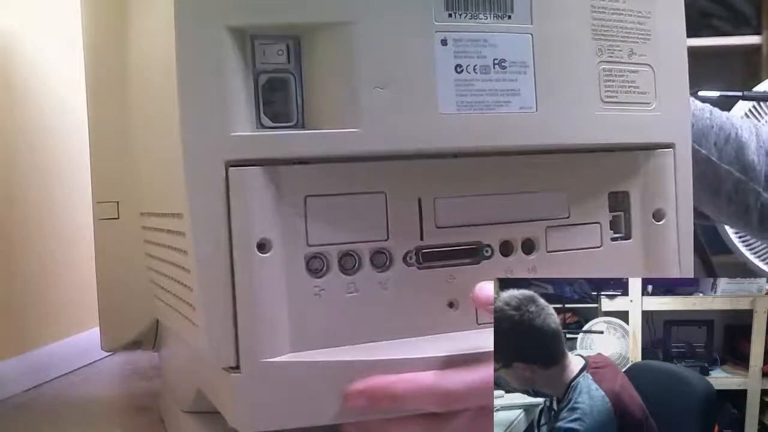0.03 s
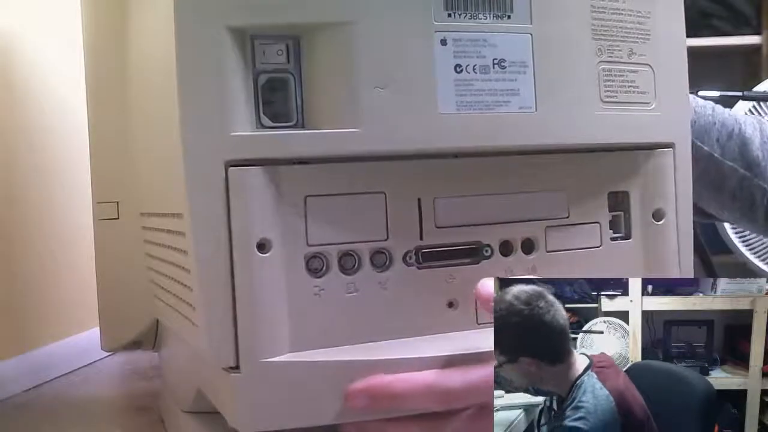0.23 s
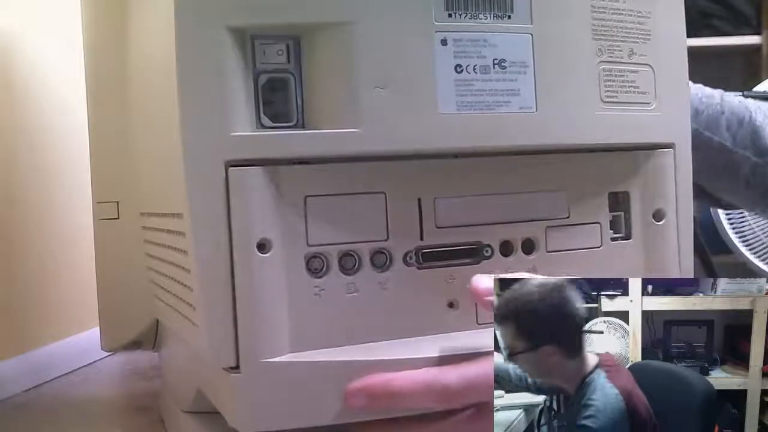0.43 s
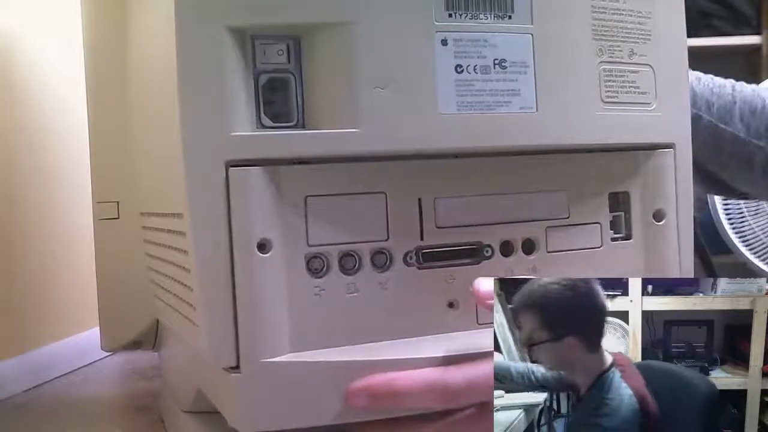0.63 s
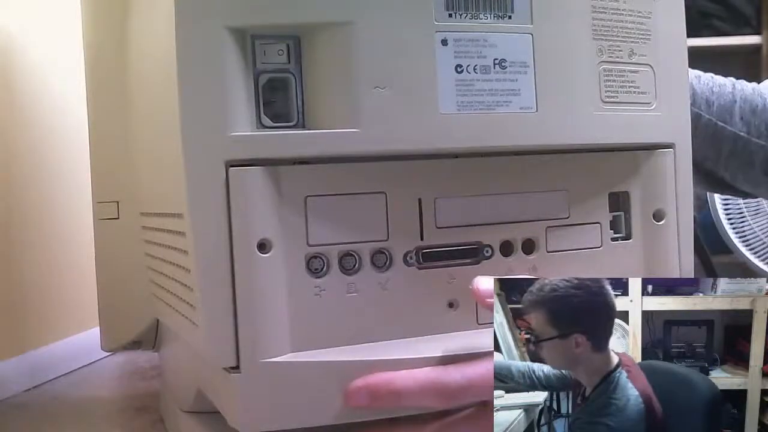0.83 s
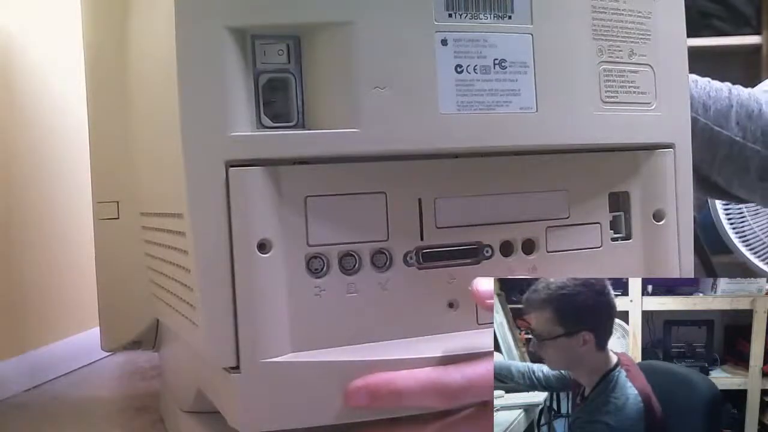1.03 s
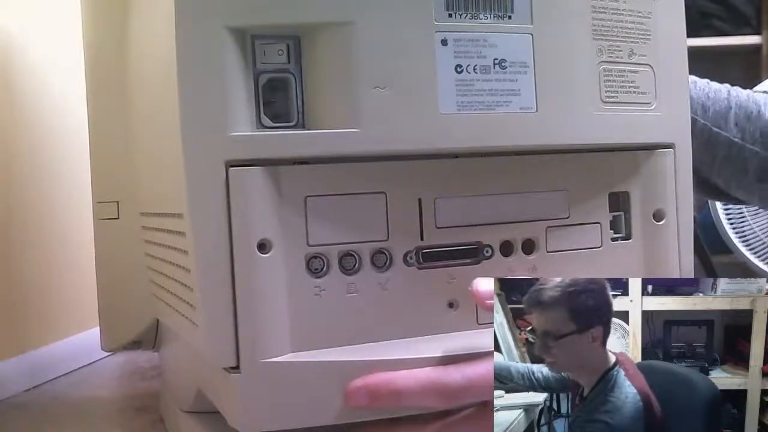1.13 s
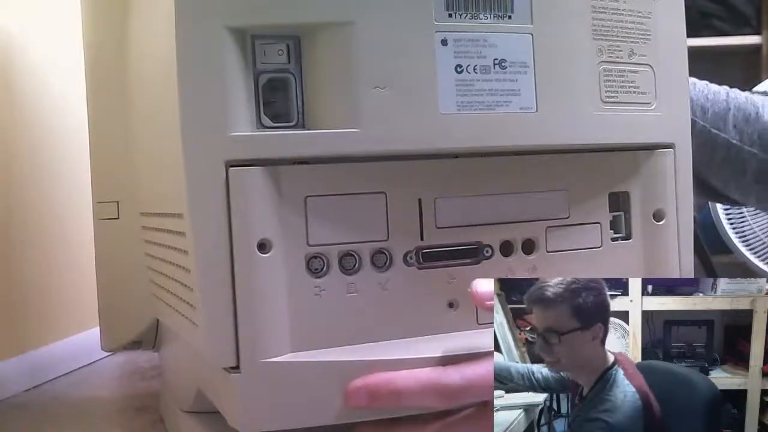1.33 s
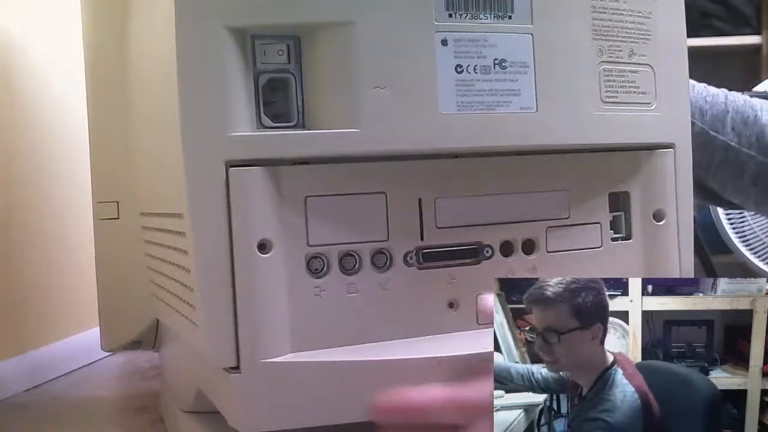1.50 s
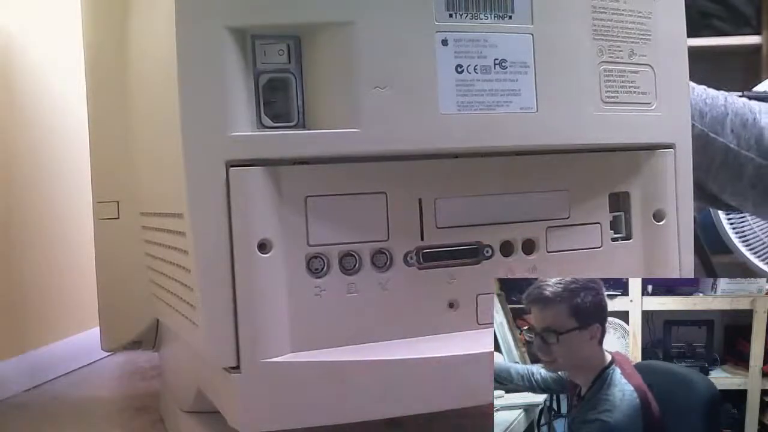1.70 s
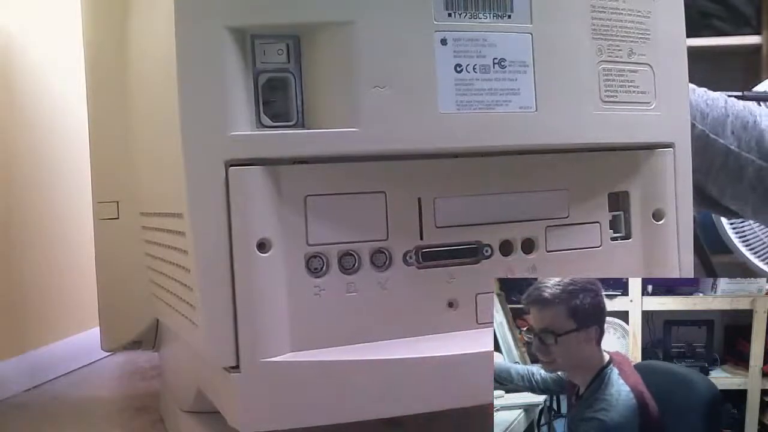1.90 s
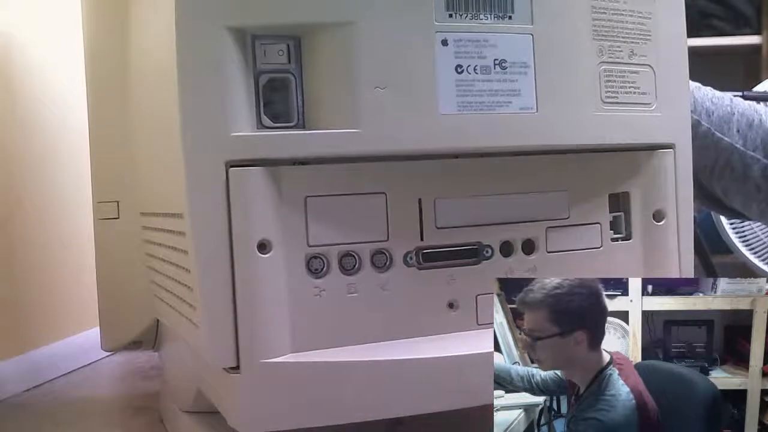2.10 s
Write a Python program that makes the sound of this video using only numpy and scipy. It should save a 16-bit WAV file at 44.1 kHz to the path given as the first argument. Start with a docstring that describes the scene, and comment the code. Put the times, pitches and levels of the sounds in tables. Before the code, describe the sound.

A sharp plastic snap rings briefly through a computer case, followed by quiet bumps and rubbing

```python
"""One loud, brittle crack of plastic is heard as hands work at an old computer on a desk.
Its fracture is a run of noise bursts; decaying sine modes make the shell and the metal inside ring.
Noise whose bands die at different speeds is the room's answer.
Then a hand slides off in grainy hiss, with noise-burst ticks, soft bumps and hollow knocks,
over steady shaped noise and a low mains hum of sines."""
import sys
import numpy as np
from scipy import signal
from scipy.fft import rfft, irfft
from scipy.io import wavfile
from scipy.ndimage import uniform_filter1d

SR = 44100
rng = np.random.default_rng(int(sys.argv[2]) if len(sys.argv) > 2 else 0)


def store_wav(level_fs):
    """Save 16-bit WAV to argv[1]."""
    pcm = np.round(np.clip(np.atleast_2d(level_fs), -1, 1) * 32767)
    wavfile.write(sys.argv[1], SR, pcm.T.astype(np.int16))


N = 94815  # length in samples


def amp(db):
    """Level to amplitude: 20 dB is a factor of ten."""
    return 10 ** (np.asarray(db) / 20)


def evened(x):
    """Normalisation: scales a signal to rms 1."""
    return x / np.sqrt(np.mean(x ** 2) + 1e-20)


def read(points, hz):
    """Logarithmic pitch scale: interpolates a table along log frequency."""
    f, value = np.transpose(points)
    return np.interp(np.log(hz + 1), np.log(f + 1), value)


def add(mix, start_s, sound):
    """Superposition: adds a sound into the mix from its start, cut at the end of the mix."""
    part = mix[max(round(start_s * SR), 0):][:len(sound)]
    part += sound[:len(part)]


def noise(colour, size):
    """Spectral synthesis: a set magnitude with random phases gives noise, here of rms 1."""
    hz = np.fft.rfftfreq(size, 1 / SR)
    phases = np.exp(2j * np.pi * rng.random(len(hz)))
    return evened(irfft(amp(read(colour, hz)) * phases, size))


def fade(t, t60):
    """Exponential damping: 60 dB down after t60 seconds."""
    return np.exp(-np.log(1000) * t / t60)


def burst(colour, rise_s, t60, size):
    """Dense modes merge: many overlapping resonances sound as coloured noise that dies away."""
    t = np.arange(size) / SR
    return noise(colour, size) * np.minimum(t / rise_s, 1) * fade(t, t60)


def ring(modes, rise_s=0.0014):
    """Modal superposition: a struck body sounds as a sum of damped sines."""
    t = np.arange(N) / SR
    out = np.zeros(N)
    for hz, db, t60 in modes:
        out += amp(db) * fade(t, t60) * np.sin(2 * np.pi * (hz * t + rng.random()))
    return out * np.minimum(t / rise_s, 1)


# Snaps as the fracture runs. Each row: start in seconds, relative level in dB.
FRACTURE_SNAPS = [(0.2429, -26), (0.2445, -12), (.2450, 5.5), (0.2456, 1.5), (0.2481, 2.5), (0.25, -2.5),
                  (0.2504, -7.5), (0.2567, -9.5)]
# Colour of a snap. Each row: frequency in Hz, relative level in dB.
SNAP_SPECTRUM = [(40, -45.5), (330, -22), (550, -4.5), (1500, -6), (2300, -14.5), (4000, -11.5),
                 (5400, -11), (6200, 3), (7200, -1), (8500, -9), (11000, -8.5), (13000, -3.5),
                 (16000, -10.5)]
SNAP_T60_S, SNAP_DB, SNAP_RISE_S = 0.014, -6, .0002


def fracture():
    """Brittle fracture: strain is released in a quick run of abrupt, broadband snaps."""
    out = np.zeros(N)
    for start_s, db in FRACTURE_SNAPS:
        snap = burst(SNAP_SPECTRUM, SNAP_RISE_S, SNAP_T60_S, size=1024)
        add(out, start_s, amp(SNAP_DB + db) * snap)
    return out


# Modes of the plastic shell. Each row: frequency in Hz, relative level in dB, t60 in seconds.
SHELL_MODES = [(420.3, -20, 0.2), (474.4, -21.5, .17), (561, -17, .16), (605, -20, .12), (684, -18.5, .14),
               (744, -26.5, .14), (836, -21, 0.11), (882, -20, .1), (920, -17, .12), (1090, -20, .14),
               (1162, -24, .14), (1217.6, -18, .12), (1427, -20, .12), (1478, -20, .13), (1590, -25.5, .13),
               (1735, -23.5, .13), (2488, -21, 0.13), (2990, -23, 0.15), (3177, -22, 0.12), (6040, -17, .1)]
# Lighter knock as the shell settles back. The row: start in seconds, gain in dB.
SHELL_REBOUND = (.2945, -23.5)
CRACK_S, SHELL_DB = .2450, -2


def shell_response():
    """Impulse response: the crack excites the shell's modes, and its rebound excites them again."""
    out = np.zeros(N)
    add(out, CRACK_S, amp(SHELL_DB) * ring(SHELL_MODES, rise_s=.003))
    rebound_s, rebound_db = SHELL_REBOUND
    add(out, rebound_s, amp(rebound_db) * ring(SHELL_MODES))
    return out


# The wavering of thin metal: its fastest rate in Hz, and its rms share of the amplitude.
WAVER_HZ, WAVER = 9.7, 0.65


def metal(modes):
    """Slow modulation: lightly damped metal modes waver in strength and phase as they decay."""
    t, out = np.arange(N) / SR, np.zeros(N)
    knots = t[::512]
    for hz, db, t60 in modes:
        # four slow random rotations make one complex drift
        drift = np.zeros(len(knots), complex)
        for rate in rng.uniform(-1, 1, size=4):
            drift += np.exp(2j * np.pi * (WAVER_HZ * rate * knots + rng.random())) / 2
        carrier = np.exp(2j * np.pi * (hz * t + rng.random()))
        wavering = 1 + WAVER * np.interp(t, knots, drift)
        out += amp(db) * fade(t, t60) * (carrier * wavering).real
    return out * np.minimum(t / 0.0055, 1)


# Modes of the metal chassis. Each row: frequency in Hz, level in dB, t60 in seconds.
CHASSIS_MODES = [(409, -61.5, 1.3), (457, -64.5, 4), (546.4, -70, 5), (966, -75, 5.2), (1028, -72.5, 3.2),
                 (1140, -63.5, 1.8), (1281, -70.5, 1), (1550, -71.5, 1.3), (1700, -81, 4),
                 (1750, -74.5, 1.6), (1771, -60, .65), (1814, -73.5, 1), (1980, -66, 0.76)]
# A small metal part, sounding from the start. Each row: frequency in Hz, level in dB, t60 in seconds.
SMALL_PART_MODES = [(1125, -73.5, 2.5), (1556, -62, .34), (1739, -67, 0.5), (1771, -65.5, 0.6),
                    (2019, -68.5, 0.77)]
# A tap that sets the chassis ringing again. The row: start in seconds, gain in dB.
TAP = (0.48, -11.5)


def metal_inside():
    """Free vibration: a small part rings faintly from the start, the chassis after crack and tap."""
    out = metal(SMALL_PART_MODES)
    add(out, CRACK_S, metal(CHASSIS_MODES))
    tap_s, tap_db = TAP
    add(out, tap_s, amp(tap_db) * metal(CHASSIS_MODES))
    return out


# Colour of the shell and room answering. Each row: frequency in Hz, relative level in dB.
TAIL_SPECTRUM = [(40, -34), (100, -17.5), (200, -20.5), (330, -16.5), (560, -7.5), (920, -5.5),
                 (1320, -12.5), (1500, -6), (2200, -11.5), (3000, -6), (3800, -13), (5400, -9.5),
                 (6200, -5), (8500, -12.5), (13300, -11.5), (16000, -19.5)]
# Decay of the room. Each row: band centre in Hz, t60 in seconds.
ROOM_DECAY = [(80, 0.27), (350, .19), (700, .14), (2000, .14), (6000, .13), (15000, .125)]
TAIL_RISE_S = .002


def room_tail(size):
    """Frequency-dependent absorption: diffuse reflections die at each band's own speed."""
    t, hz = np.arange(size) / SR, np.fft.rfftfreq(size, 1 / SR)
    spectrum, out = rfft(noise(TAIL_SPECTRUM, size)), np.zeros(size)
    centres, times = np.transpose(ROOM_DECAY)
    # each row of the identity matrix selects one overlapping band
    for band, t60 in zip(np.eye(len(times)), times):
        weight = read(np.c_[centres, band], hz)
        out += irfft(spectrum * weight, size) * fade(t, t60)
    return out * np.minimum(t / TAIL_RISE_S, 1)


# Colour of the faint late reverberation. Each row: frequency in Hz, relative level in dB.
LATE_SPECTRUM = [(60, -32), (220, -22), (400, -4), (700, 2.5), (1300, -1), (3000, -10), (6500, -12),
                 (16000, -22)]
TAIL_DB, LATE_DB, LATE_T60_S = -9.5, -45, 0.38


def room_answer():
    """Reverberation: dense reflections of the crack, with a fainter and slower late field."""
    out = np.zeros(N)
    add(out, CRACK_S, amp(TAIL_DB) * room_tail(size=22050))
    late = burst(LATE_SPECTRUM, .02, LATE_T60_S, size=32768)
    add(out, CRACK_S, amp(LATE_DB) * late)
    return out


# Hollow knocks on the case. Each row: start in seconds, level in dB, t60 in seconds.
CASE_KNOCKS = [(1.477, -59, 0.13), (1.497, -49.5, 0.076), (1.7225, -59, 0.098), (1.752, -61, 0.15),
               (1.807, -63.5, 0.15), (1.929, -67, 0.098), (1.9828, -41.5, 0.15), (2.122, -59, 0.098)]
# Colour of a knock. Each row: frequency in Hz, relative level in dB.
KNOCK_SPECTRUM = [(60, -14), (150, -16), (240, 9.5), (450, 6.5), (750, -5.5), (1300, -1), (1900, -4.5),
                  (3500, -19.5), (7000, -26.5), (10000, -35), (16000, -47)]
KNOCK_SHELL_DB = 3  # shell modes against the knock's own level
KNOCK_REACH_HZ = 2200  # a soft contact hardly reaches the modes above this


def knocks():
    """Contact time: a soft blow lasts too long to excite the shell's high modes."""
    out = np.zeros(N)
    dull_shell = []
    for hz, db, t60 in SHELL_MODES:
        loss_db = 10 * np.log10(1 + (hz / KNOCK_REACH_HZ) ** 4)
        dull_shell.append((hz, db - loss_db, t60))
    for start_s, db, t60 in CASE_KNOCKS:
        add(out, start_s, amp(db) * burst(KNOCK_SPECTRUM, 0.00043, t60, size=8192))
        add(out, start_s, amp(db + KNOCK_SHELL_DB) * ring(dull_shell))
    return out


# Dry ticks of stressed plastic. Each row: start in seconds, level in dB, t60 in seconds,
# brightness in dB per octave.
PLASTIC_TICKS = [(0.536, -59.5, 0.11, -8.5), (.605, -73, .08, 0), (1.0205, -54.5, .014, 2.5),
                 (1.092, -73, .02, -2), (1.119, -77, .02, 4), (1.487, -56, .04, -1),
                 (1.496, -51.5, 0.033, -2), (1.585, -68.5, .07, 6), (1.7225, -66, .06, 1.5),
                 (1.753, -68, 0.068, -4)]
# Colour of a tick before its brightness. Each row: frequency in Hz, relative level in dB.
TICK_SPECTRUM = [(200, -17), (1500, -17), (2500, 0.5), (3400, -3.5), (4300, -3.5), (6300, 0), (10000, -7.5),
                 (13000, -10), (16000, -14.5)]


def ticks():
    """Stress release: each tick of stressed plastic is a short burst with its own spectral tilt."""
    out = np.zeros(N)
    for start_s, db, t60, tilt_db in PLASTIC_TICKS:
        colour = [(hz, level + tilt_db * np.log2(hz)) for hz, level in TICK_SPECTRUM]
        add(out, start_s, amp(db) * burst(colour, 0.00039, t60, size=4096))
    return out


# Soft bumps as the weight shifts. Each row: start in seconds, level in dB, t60 in seconds.
WEIGHT_BUMPS = [(0, -47.5, .4), (1.502, -46, 0.23), (1.774, -53.5, 0.54), (1.811, -57, 0.26),
                (1.995, -50, 0.31), (2.061, -66, .4)]
# Colour of a bump. Each row: frequency in Hz, relative level in dB.
BUMP_SPECTRUM = [(25, -11.5), (75, 0.5), (120, -3.5), (180, 0), (400, -9.5), (800, -22.5), (2000, -42.5),
                 (8000, -61.5)]
BUMP_RISE_S = .006


def bumps():
    """Slow loading: a gradual push puts its energy into low frequencies."""
    out = np.zeros(N)
    for start_s, db, t60 in WEIGHT_BUMPS:
        add(out, start_s, amp(db) * burst(BUMP_SPECTRUM, BUMP_RISE_S, t60, size=16384))
    return out


# Skin sliding on plastic. Each row: start in seconds, length in seconds, level in dB.
SKIN_STROKES = [(1.469, 0.14, -66.5), (1.537, 0.12, -83), (1.648, 0.059, -73), (2.001, 0.068, -70)]
# Colour of the hiss. Each row: frequency in Hz, relative level in dB.
RUB_SPECTRUM = [(100, 13), (700, 2.5), (1800, 3), (3500, -5), (6200, 2.5), (9000, -3), (15000, -0.5),
                (16000, -13)]
RUB_EDGE_S, RUB_GRAIN_DB = 0.018, -1  # fade at both ends; the grain swings both ways, 1 dB rms
CATCH_PER_S, CATCH_DB = 220, -5.5  # mean rate; level against the hiss before its grain


def rubbing():
    """Sliding friction: skin on textured plastic gives a grainy hiss with tiny random catches."""
    t = np.arange(N) / SR
    slow_noise = evened(uniform_filter1d(rng.standard_normal(N), size=130))
    hiss = amp(RUB_GRAIN_DB * slow_noise) * noise(RUB_SPECTRUM, N)
    slips = (rng.random(N) < CATCH_PER_S / SR) * rng.standard_normal(N)
    catch = burst(TICK_SPECTRUM, .0002, 0.0099, size=512)
    catches = evened(signal.oaconvolve(slips, catch)[:N])
    stroke = np.zeros(N)
    for start_s, length_s, db in SKIN_STROKES:
        to_edge_s = np.minimum(t - start_s, start_s + length_s - t)
        stroke += amp(db) * np.clip(to_edge_s / RUB_EDGE_S, 0, 1)
    return stroke * (hiss + amp(CATCH_DB) * catches)


# Colour of the room noise. Each row: frequency in Hz, relative level in dB per Hz.
FLOOR_SPECTRUM = [(20, -16.5), (55, 2), (100, -4), (160, -16.5), (260, -8), (420, -15.5), (700, -23.5),
                  (1050, -21), (1600, -30), (3000, -37), (8000, -40.5), (16000, -43)]
# Mains hum and a faint electrical whine. Each row: frequency in Hz, rms level in dB.
HUM_TONES = [(59.8, -70), (119.8, -66), (243, -76.5), (7671, -95), (12958, -100)]
FLOOR_DB = -63.5  # rms


def background():
    """Stationary sound: room noise of fixed spectrum under steady electrical tones."""
    t = np.arange(N) / SR
    out = amp(FLOOR_DB) * noise(FLOOR_SPECTRUM, N)
    for hz, db in HUM_TONES:
        out += np.sqrt(2) * amp(db) * np.sin(2 * np.pi * (hz * t + rng.random()))
    return out


def scene():
    """Linear superposition: all sources add at one close microphone."""
    crack = fracture() + shell_response() + metal_inside() + room_answer()
    handling = knocks() + ticks() + bumps() + rubbing()
    return (crack + handling + background())[None]


EDGE_HZ = 16100


def record(dry):
    """Overload and band limiting: the input clips peaks beyond 0.95, then a low-pass cuts the top."""
    clipped = np.clip(dry, -.95, .95)
    low_pass = signal.firwin(161, EDGE_HZ, window=("kaiser", 7), fs=SR)
    return signal.oaconvolve(clipped, low_pass[None], "same")


dry = scene()
out = record(dry)
store_wav(out)
```